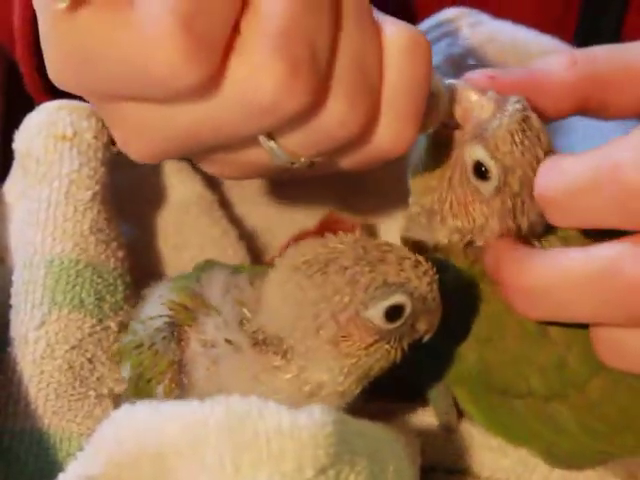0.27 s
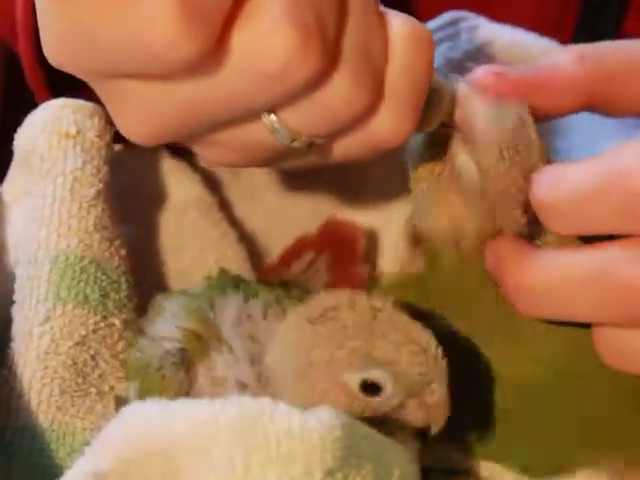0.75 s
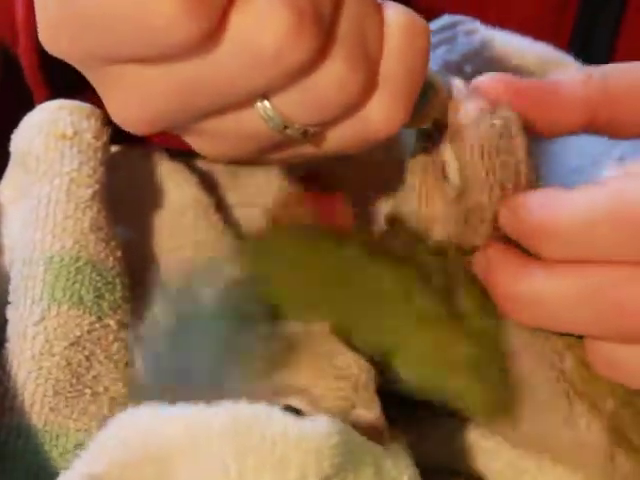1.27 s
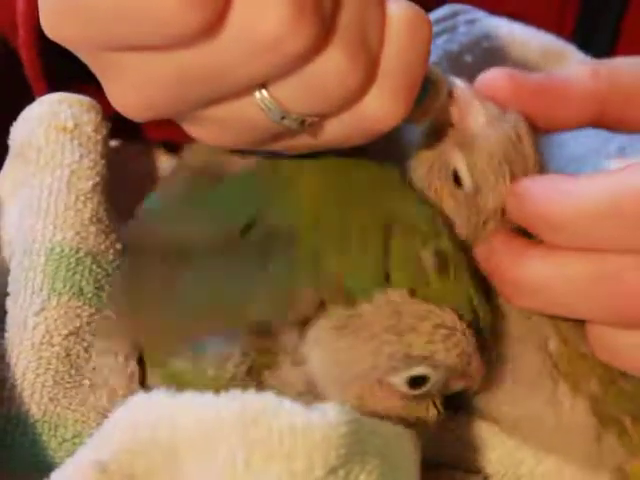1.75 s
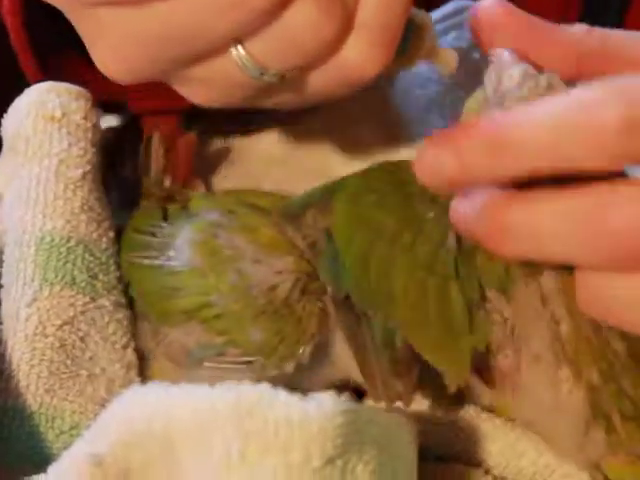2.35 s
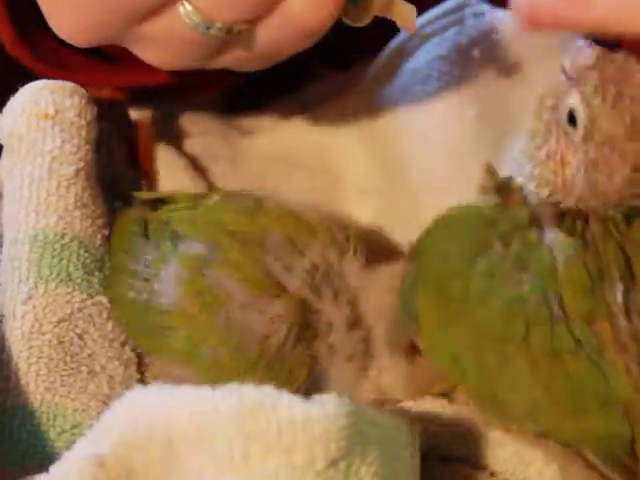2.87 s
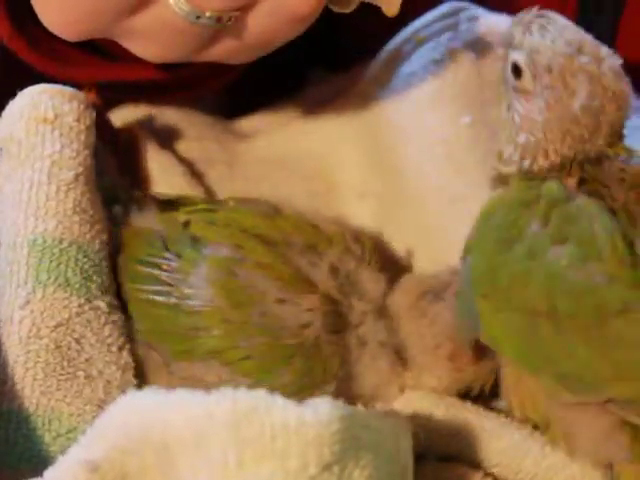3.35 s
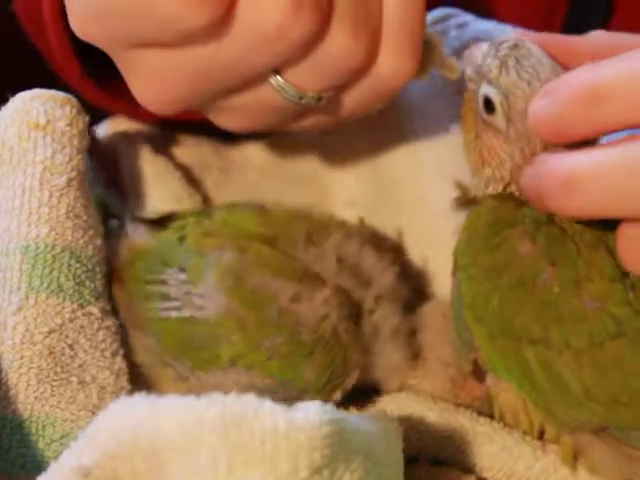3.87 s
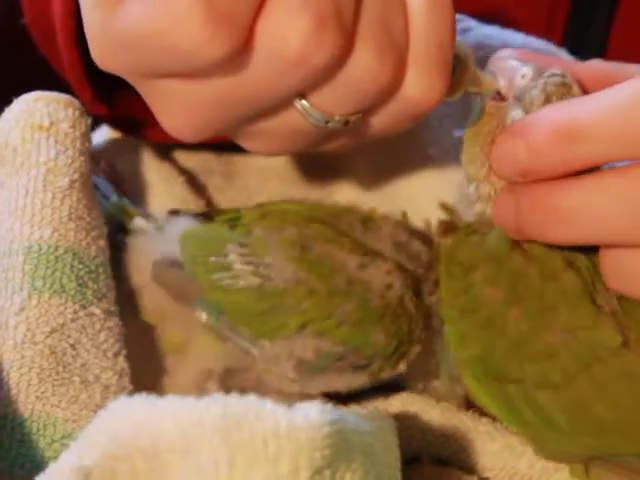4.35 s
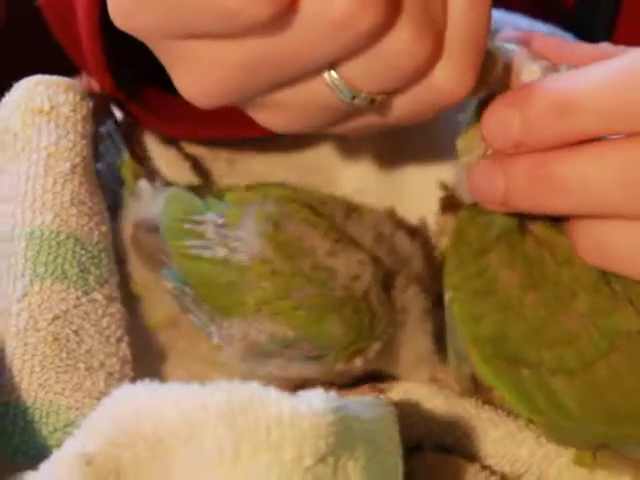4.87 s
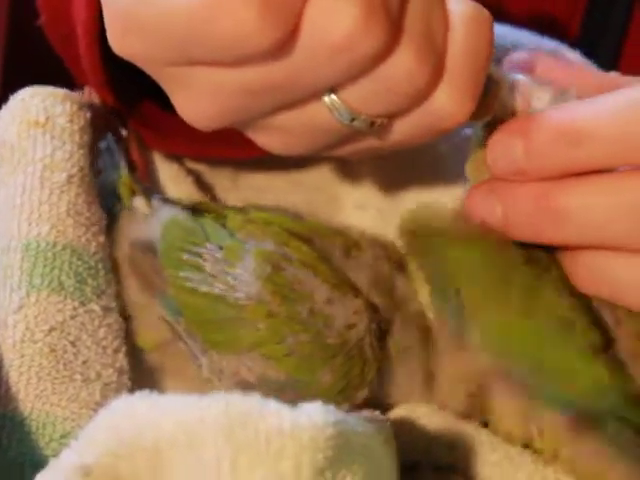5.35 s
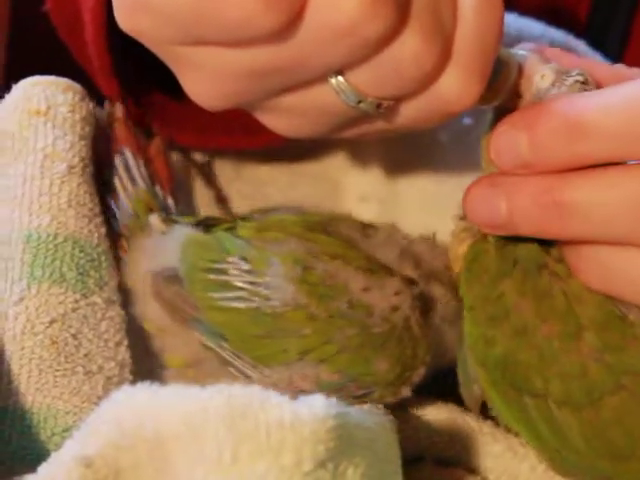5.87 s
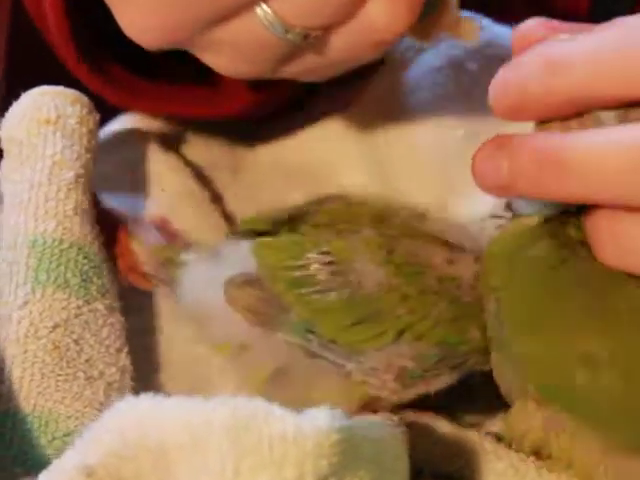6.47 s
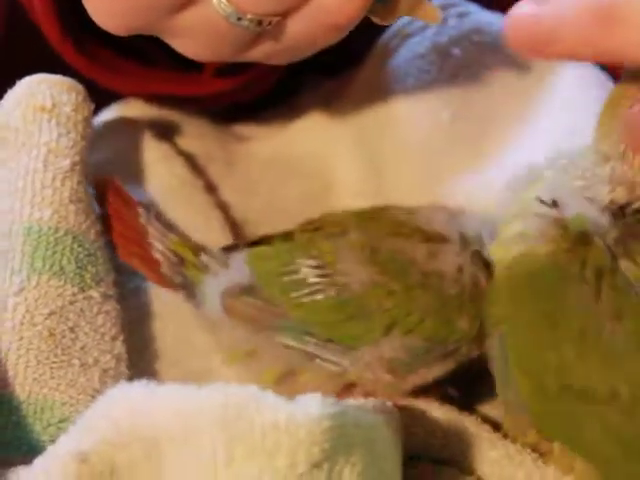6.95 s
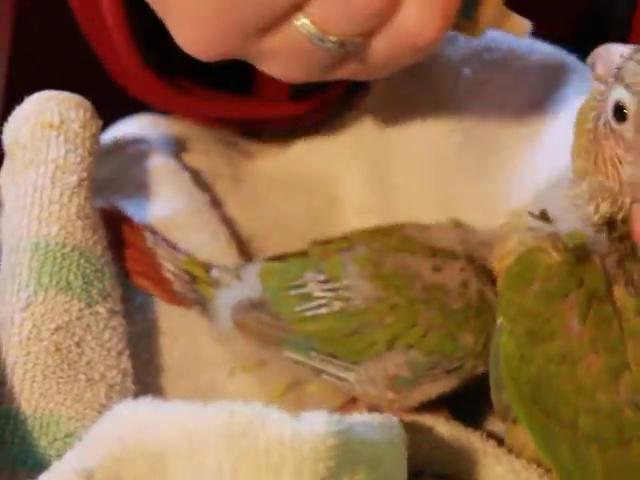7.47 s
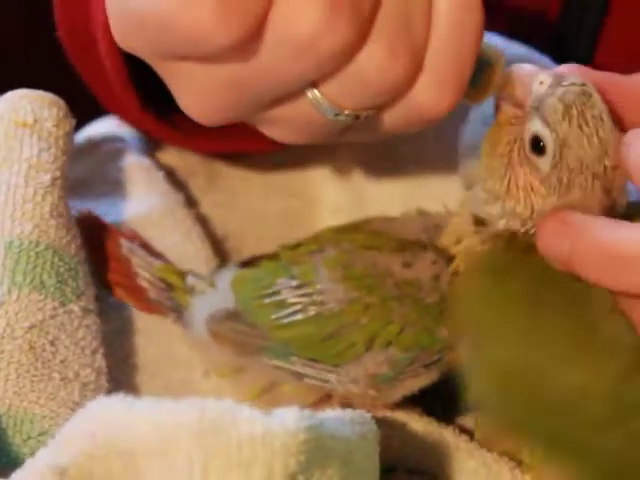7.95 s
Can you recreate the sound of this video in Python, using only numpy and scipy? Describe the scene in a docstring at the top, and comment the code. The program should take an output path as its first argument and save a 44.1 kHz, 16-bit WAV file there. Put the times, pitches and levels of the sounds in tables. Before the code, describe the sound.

Young parrots beg on a towel very close to the microphone in a small, hard-walled room. Very short harsh squawks and clear, falling chirps come singly, with quiet gaps; a throbbing rasp appears early and a fainter one later. Beaks and claws tick, bodies bump softly, cloth and feathers rustle. Near the end a hollow object is lightly knocked. Steady room air and a faint appliance hum lie beneath.

```python
"""A small hard-walled room, where parrot chicks beg on a towel close to a microphone.
Squawks, chirps and two throbbing rasps are stacks of overtones shaped by throat and beak.
Beaks tick and bodies bump as short dying tones; a hollow object rings when knocked.
Towel and feathers rustle as grainy noise over room air and an appliance's two-tone hum.
A gain control turns everything down when it gets loud, then slowly back up."""
import sys
import numpy as np
from scipy import signal
from scipy.fft import rfft, irfft, next_fast_len
from scipy.io import wavfile
from scipy.ndimage import uniform_filter1d, map_coordinates

SR = 44100
rng = np.random.default_rng(int(sys.argv[2]) if len(sys.argv) > 2 else 0)


def inscribe(sig):
    """Save sig as 16-bit PCM at rate SR to the path in sys.argv[1].

    A 1-D sig is mono; a 2-D sig holds one channel per row.
    Samples are clipped to [-1, 1] before scaling.
    """
    pcm = np.round(np.clip(np.atleast_2d(sig).T, -1, 1) * 32767)
    wavfile.write(sys.argv[1], SR, pcm.astype(np.int16))


def convert_level_to_amplitude(level_db):
    """Map a level in decibels to its linear amplitude factor."""
    exponent = np.asarray(level_db, float) / 20
    return 10 ** exponent


N = 362502  # length in samples

# harsh calls: (start t/s, length t/s, level/dB, top pitch f/Hz, top at this share of the length,
# final period-doubling level/dB)
SQUAWKS = [(.655, .035, -8, 1890, .3, 1.5), (1.7102, .031, -8.5, 1860, .55, 4),
           (2.534, .031, -6, 2030, .25, 7), (2.937, .043, -9, 2110, .35, 2.5),
           (6.1075, .032, -8, 2010, .45, .5), (6.7762, .032, -8, 1960, .55, 3)]
# clear calls: (start t/s, hold t/s, level/dB, first pitch f/Hz, held pitch f/Hz, gain over the hold level/dB)
CHIRPS = [(.0072, .025, -11, 1750, 1310, -1.5), (3.1045, .027, -14, 1100, 1325, 6),
          (4.180, .021, -17, 1600, 1265, 9), (4.9015, .016, -11, 1800, 1210, 1.2),
          (7.8645, .008, -14, 1560, 1760, 6)]
# throbbing calls: (start t/s, hold t/s, level/dB, first pitch f/Hz, held pitch f/Hz, gain over the hold level/dB)
RASPS = [(1.4645, .076, -18.5, 1150, 1380, 4.5), (5.4095, .069, -27, 1200, 1480, 4.5)]
# throbs of each rasp: (time from peak to 1/e t/s, level between throbs up to 2.5 kHz level/dB,
# breath share at 2.5 kHz)
THROBS = [(.0015, -22, 0.6), (.0021, -12, 0.62)]
# beak through all calls: (time t/s, resonance f/Hz, brightness level/dB per octave)
BEAK = [(.010, 5700, 1.2), (.016, 4200, 2.2), (.026, 4600, 2.2), (.040, 3700, 3), (.658, 4400, 3),
        (.665, 5200, 7), (.673, 4600, 6), (.680, 3300, 3), (1.471, 3000, 2.5), (1.503, 3000, 3.5),
        (1.512, 5600, 2.5), (1.521, 3200, 3.5), (1.543, 2600, 2.2), (1.714, 7000, -2.5), (1.719, 5900, 3),
        (1.726, 2900, 6), (1.732, 6800, 3), (1.741, 2900, 4), (2.537, 5600, .3), (2.548, 4750, 2.5),
        (2.565, 3400, 2.5), (2.941, 4800, 1.5), (2.946, 3100, 3), (2.953, 3400, 4), (2.959, 5400, 1.5),
        (2.970, 6100, 2.5), (3.110, 3700, 3), (3.117, 5000, -2.5), (3.124, 6500, 2.2), (3.133, 4100, 5),
        (3.150, 2600, 3), (4.184, 4000, 3.5), (4.188, 7500, -2.5), (4.194, 5000, 1.2), (4.200, 3800, 5),
        (4.906, 5500, -.5), (4.912, 4200, .3), (4.930, 3200, .3), (5.415, 2400, -1.5), (5.430, 2900, .3),
        (5.470, 3000, 1.2), (5.482, 2300, .3), (6.111, 5600, -.5), (6.117, 7200, 2.5), (6.125, 5800, 4.5),
        (6.138, 3100, 3), (6.780, 4200, .3), (6.786, 4700, -.5), (6.794, 3900, -.5), (6.803, 3100, -.5),
        (7.868, 3400, 2.5), (7.872, 6800, -1.5), (7.878, 3400, 2.5), (7.885, 5800, 1.5), (7.895, 3700, 1.2)]
# throat colour of squawks and chirps: (f/Hz, relative level/dB)
THROAT = [(500, -39.5), (1000, -14.5), (1500, -6.5), (2100, -10.5), (2900, -4), (4500, -9), (6500, -10),
          (8500, -15.5), (12000, -25), (16000, -43.5)]
# throat colour of rasps: (f/Hz, relative level/dB)
RASP_THROAT = [(500, -28), (900, -10.5), (1400, 6), (1950, -10.5), (2550, -1), (3300, -10.5), (4100, -10.5),
               (5500, 1.5), (6600, -6), (7600, -8.5), (9500, -14.5), (16000, -32.5)]
# beak or claw contacts: (start t/s, tick level/dB, tick f/Hz, bump level/dB before a 1.5 dB lift, bump f/Hz)
CONTACTS = [(0.9134, -35.5, 1700, -32, 1580), (.965, -30, 2700, -50, 1400), (0.977, -33.5, 7800, -67, 758),
            (0.995, -32, 3500, -31, 1520), (1.077, -31.5, 3500, -47, 1316),
            (1.2175, -22.5, 7850, -38, 1530), (1.2458, -30.5, 4000, -37, 1490),
            (1.296, -28, 3980, -47, 400), (1.3068, -31.5, 7500, -50, 756), (1.329, -40, 4530, -60, 900),
            (1.417, -39, 5000, -60, 900), (1.708, -24, 3000, -28, 893), (2.5277, -26, 3000, -43, 980),
            (4.0378, -57, 1570, -40.5, 400), (4.531, -40, 9000, -60, 900), (4.6014, -38, 2060, -34, 1330),
            (4.6565, -31.5, 3490, -35.5, 189), (4.680, -39, 9090, -40, 200), (4.789, -43, 6000, -60, 890),
            (5.052, -20, 2164, -40, 1206), (5.260, -43.5, 7500, -60, 896), (5.269, -29, 3000, -52, 1320),
            (5.3063, -26.5, 3650, -20.5, 829), (5.353, -29, 2570, -29, 1360),
            (5.3759, -24, 2360, -23, 1105), (5.882, -41.5, 2000, -34, 425), (6.6506, -34.5, 6000, -40, 890),
            (7.22, -37.5, 1400, -35.5, 763), (7.3307, -24, 2300, -32.5, 455),
            (7.729, -41.5, 1800, -33.5, 530), (8.072, -50, 1400, -43, 513), (8.092, -35, 2790, -42, 1100)]
# soft knocks on a hollow object: (start t/s, level/dB, hardness level/dB per octave)
KNOCKS = [(7.228, -41, -6), (8.088, -34.5, 10), (8.176, -34.5, -2)]
# ringing modes of that object: (f/Hz, relative level/dB, time to die by 60 dB t/s)
HOLLOW = [(300, 0, .08), (740, -2, .09), (1100, -4, .09), (1640, -4, .09), (2600, -20, .04)]
# early echoes from nearby surfaces: (delay t/s, level/dB)
ECHOES = [(.0021, -25.5), (.0047, -15.5), (.008, -15.5), (0.011, -10.5), (0.018, -19.5), (0.026, -13)]
# how long the walls ring: (f/Hz, time to die by 60 dB t/s)
WALLS = [(300, .35), (1300, 0.51), (2600, 0.37), (4000, 0.36), (6000, 0.34), (10000, 0.33), (16000, 0.3)]
# how strongly the walls ring: (f/Hz, relative level/dB)
WALL_GAIN = [(300, -10), (1300, -11), (2600, -6), (4000, -4), (7000, -5), (16000, -8)]
# movements: (peak t/s, rise by 20 dB t/s, cloth's fall by 20 dB t/s, cloth level/dB, feathers over cloth level/dB)
MOVEMENTS = [(1.2, .5, .4, -54, 1.5), (1.44, .25, .05, -52, .3), (2.13, .08, .2, -54, -.5),
             (2.415, .03, .1, -44, -9), (4.56, .1, .15, -61, 4), (4.68, .08, .1, -58, -9),
             (5.04, .03, .3, -49, -8), (5.28, .25, .15, -51, -11), (5.884, .01, .12, -37, -13),
             (6.65, .4, .3, -57, .3), (7.23, .2, .15, -52, -13), (7.34, .05, .05, -44, -10),
             (7.736, .015, .14, -41, -7), (8.075, .012, .12, -40, -18), (8.185, .05, .15, -50, -19)]
# colour of towel noise: (f/Hz, relative level/dB per Hz)
CLOTH = [(60, -31), (150, -4), (400, -0.5), (900, 2.5), (1700, -2.5), (3000, -6), (6000, -40.5)]
# colour of feather noise: (f/Hz, relative level/dB per Hz)
FEATHER = [(1200, -30), (2500, -1.5), (5000, -4.5), (9000, -12), (15000, -11.5)]
# colour of room air: (f/Hz, relative level/dB per Hz)
AIR = [(15, -58), (25, -24.5), (92, -9), (123, -13.5), (190, -6.5), (394, -6.5), (641, -6), (754, -4.5),
       (840, -7), (1020, -5.5), (2000, -8), (2480, -14), (16000, -29)]
# appliance tones: (f/Hz, typical rms level/dB)
HUM = [(743, -62.5), (1487, -69.5)]

# every call climbs by RISE_DB in RISE_S to BURST_DB too loud, then settles
RISE_S, RISE_DB, BURST_S, BURST_DB = .003, 38, .002, 3.5
SQUAWK_BREATH, CHIRP_BREATH = .24, .04  # noisy share of the voice (0-1)
# squawk: pitch at both ends of its arch, and level change by its end
SQUAWK_FIRST_HZ, SQUAWK_LAST_HZ, SQUAWK_FADE_DB = 1760, 1570, -6
DOUBLING_FIRST_DB, DOUBLING_S = -11, .012  # period doubling: first level, time to reach the final one
WAVER_SHARE, TREMOR_DB, WAVERS_PER_S = .03, 2.5, 160  # a squawk's unsteady pitch and level
# held calls: pitch drop after the hold, softness of its corner, and the pitch where the call stops
FALL_HZ_PER_S, KNEE_S, LOWEST_HZ = 29000, .002, 710
SLACK_HZ, SLACK_TILT_DB = 1330, -14  # below this pitch: brightness change for each octave lower
# habits: (pitch settles in t/s, period-doubling level/dB, level change/dB per octave below SLACK_HZ)
CHIRP_HABIT, RASP_HABIT = (.003, -42, -30), (.02, 2.2, -12)
THROBS_PER_S, THROB_LAG_S, THROB_SCATTER_S = 141, .0028, .0005
THROB_SPREAD_DB, THROB_TILT_DB = 1.8, 2.2  # chance in level, and in brightness per octave above 2.5 kHz


def unit(x):
    """Scales a signal to rms 1."""
    return x / np.sqrt(np.mean(x ** 2) + 1e-20)


def along(points, hz):
    """Reads values between (f/Hz, value) points, evenly by musical interval."""
    f, value = np.transpose(points)
    return np.interp(np.log(hz + 1), np.log(f + 1), value)


def add(track, s, sound):
    """Mixes a sound into the track at s seconds."""
    part = track[round(s * SR):][:len(sound)]
    part += sound[:len(part)]


def coloured(x, spectrum):
    """Filters x by raising or lowering each frequency as the colour table says."""
    size = next_fast_len(len(x) + 8192)
    gain = convert_level_to_amplitude(along(spectrum, np.fft.rfftfreq(size, 1 / SR)))
    return irfft(rfft(x, size) * gain, size)[:len(x)]


def wobble(rate, shape):
    """Draws smooth random curves through rate random points a second."""
    rows, n = shape
    knots = rng.standard_normal((rows, int(n * rate / SR) + 4))
    return map_coordinates(knots, np.meshgrid(np.arange(rows), np.arange(n) * rate / SR, indexing="ij"))


def chicks():
    """Every call as (start, sound): the syrinx, a bird's voice organ, buzzes through throat and beak."""
    squawks = [voice(squawk(*row), SQUAWK_BREATH, THROAT) for row in SQUAWKS]
    chirps = [voice(held_call(*row, CHIRP_HABIT), CHIRP_BREATH, THROAT) for row in CHIRPS]
    rasps = [voice(held_call(*row, RASP_HABIT), breath, RASP_THROAT, throbbing(width, between_db))
             for row, (width, between_db, breath) in zip(RASPS, THROBS)]
    return squawks + chirps + rasps


def voice(rows, breath, throat, flutter=None):
    """Sums syrinx overtones shaped by throat and beak; breath smears each into a band of noise."""
    s, *columns = np.transpose(rows)
    t = np.arange(s[0], s[-1] + .004, 1 / SR)
    pitch, db, doubling_db, beak_hz, tilt_db = [np.interp(t, s, column) for column in columns]
    order = np.arange(1, 41)[:, None] / 2  # half orders come from period doubling
    hz = order * pitch
    level = along(throat, hz) + tilt_db * np.log2(hz / 3500) + (order % 1 > 0) * doubling_db
    resonance = 1 + 3 / (1 + ((hz - beak_hz) / 700) ** 2)
    gain = convert_level_to_amplitude(level) * resonance * (hz < .45 * SR)
    gain /= np.sqrt(np.sum(gain ** 2, axis=0) / 2)  # same total strength at every moment
    breath = np.clip(breath, 0, 1)
    if flutter:
        throb, depth = flutter(t, hz)
        gain = gain * throb
        breath = np.clip(breath * depth, 0, 1)  # breath takes over the treble
    noise = wobble(900, hz.shape) + 1j * wobble(900, hz.shape)
    smear = np.sqrt(1 - breath) + np.sqrt(breath / 2) * noise
    phase = 2 * np.pi * (np.cumsum(hz, axis=1) / SR + .5 + .4 * rng.random(order.shape))
    fade = np.clip((t[-1] - t) / .004, 0, 1)
    overtones = gain * smear * np.exp(1j * phase)
    return t[0], convert_level_to_amplitude(db) * fade * np.sum(overtones, axis=0).real


def squawk(s, length, db, top_hz, top_at, full_db):
    """Pitch arches unsteadily and the call fades; every other cycle grows unlike its neighbour."""
    u = np.arange(0, length, 1 / SR)
    share = u / length
    end_hz = np.where(share < top_at, SQUAWK_FIRST_HZ, SQUAWK_LAST_HZ)
    away = (share - top_at) / np.where(share < top_at, top_at, 1 - top_at)  # distance from the top of the arch
    waver, tremor = wobble(WAVERS_PER_S, (2, SR // 10))[:, :len(u)]
    pitch = (top_hz + (end_hz - top_hz) * away ** 2) * (1 + WAVER_SHARE * waver)
    level = db + attack(u) + SQUAWK_FADE_DB * share + TREMOR_DB * tremor
    doubling_db = np.interp(u, [0, DOUBLING_S], [DOUBLING_FIRST_DB, full_db])
    return np.transpose([s + u, pitch, level, doubling_db, *beak(s + u)])


def held_call(s, hold, db, first_hz, held_hz, swell_db, habit):
    """Pitch settles and holds, then drops as the syrinx slackens, ever softer and duller."""
    settle, doubling_db, slack_db = habit
    u = np.arange(0, hold + (held_hz - LOWEST_HZ) / FALL_HZ_PER_S, 1 / SR)
    tense_hz = held_hz + (first_hz - held_hz) * np.exp(-u / settle)
    pitch = tense_hz - FALL_HZ_PER_S * KNEE_S * np.logaddexp(0, (u - hold) / KNEE_S)
    slack = np.maximum(np.log2(np.minimum(tense_hz, SLACK_HZ) / pitch), 0)  # in octaves
    level = db + attack(u) + swell_db * np.minimum(u / hold, 1) + slack_db * slack
    doubling_db = doubling_db + 2 * slack_db * slack
    beak_hz, tilt_db = beak(s + u)
    return np.transpose([s + u, pitch, level, doubling_db, beak_hz, tilt_db + SLACK_TILT_DB * slack])


def throbbing(width, between_db):
    """Air comes in quick, nearly even throbs of chance brightness that melt away as the call ends."""
    def flutter(t, hz):
        """Gives the throbs' gain and the breath's strength for each overtone."""
        octaves = np.maximum(np.log2(hz / 2500), 0)
        throb = convert_level_to_amplitude(between_db - 5.5 * octaves)
        chance = rng.standard_normal((20, 3)) * [THROB_SCATTER_S, THROB_SPREAD_DB, THROB_TILT_DB]
        for k, (late, db, brightness_db) in enumerate(chance):
            peak = t[0] + THROB_LAG_S + k / THROBS_PER_S + late
            throb = throb + convert_level_to_amplitude(db + brightness_db * octaves) * np.exp(-((t - peak) / width) ** 2)
        depth = np.clip((t[-1] - t) / .02, 0, 1)
        return 1 + depth * (throb - 1), depth * (.5 + hz / 5000)
    return flutter


def attack(u):
    """Level change in dB, u seconds into a call: the voice breaks in too hard, then settles."""
    rise = -RISE_DB * np.clip(1 - u / RISE_S, 0, 1)
    return rise + BURST_DB * np.exp(-np.maximum(u - RISE_S, 0) / BURST_S)


def beak(t):
    """The moving beak's resonance and brightness at times t."""
    s, hz, tilt_db = np.transpose(BEAK)
    return np.interp(t, s, hz), np.interp(t, s, tilt_db)


def contacts():
    """A beak or claw ticks in a few bright cycles; the body behind it bumps and dies away by its own pitch."""
    t = np.arange(SR // 20) / SR
    out = []
    for s, tick_db, tick_hz, bump_db, bump_hz in CONTACTS:
        scrape = uniform_filter1d(rng.standard_normal(len(t)), size=max(round(SR / tick_hz / 4), 1))
        crack = np.sin(2 * np.pi * tick_hz * t) * convert_level_to_amplitude(-6 * tick_hz * t)
        crack += 0.587 * unit(scrape) * convert_level_to_amplitude(-60 * t / 0.02)
        cycles = bump_hz * t
        bump = np.sin(2 * np.pi * cycles) * convert_level_to_amplitude(-7 * cycles)
        bump += .5 * np.sin(2 * np.pi * 2.41 * cycles) * convert_level_to_amplitude(-14 * cycles)
        tick = convert_level_to_amplitude(tick_db) * (1 - np.exp(-t / .0003)) * crack
        out.append((s, tick + convert_level_to_amplitude(bump_db + 1.5) * bump))
    return out


def knocks():
    """Each knock rings the same modes of a hollow object; a harder one favours the upper modes."""
    t = np.arange(SR // 5) / SR
    hz, level, t60 = np.transpose(HOLLOW)[:, :, None]
    out = []
    for s, db, hardness_db in KNOCKS:
        strength = convert_level_to_amplitude(db + level + hardness_db * np.log2(hz / 740) - 60 * t / t60)
        cycles = hz * t + 0.28 * wobble(150, strength.shape)  # slightly unsteady
        ring = np.sum(strength * np.sin(2 * np.pi * cycles), axis=0)
        out.append((s, ring * (1 - np.exp(-t / 0.0026))))
    return out


def room(sound):
    """Nearby surfaces echo early, while the walls' noisy tail swells in and dies band by band."""
    hz, t, z = signal.stft(rng.standard_normal(SR * 3 // 4), SR, nperseg=256)
    decay = convert_level_to_amplitude(-60 * t / along(WALLS, hz)[:, None])
    decay *= convert_level_to_amplitude(along(WALL_GAIN, hz))[:, None] / np.linalg.norm(decay, axis=1, keepdims=True)
    noise = unit(np.abs(z)) * z / np.abs(z)
    tail = signal.istft(noise * decay, SR, nperseg=256)[1]
    swell = 1 - np.exp(-(np.arange(len(tail)) / SR / .02) ** 2)
    answer = .013 * tail * swell
    answer[0] = 1  # the direct sound
    for delay, db in ECHOES:
        answer[round(delay * SR)] += convert_level_to_amplitude(db)
    return signal.fftconvolve(sound, answer)


def rustle():
    """Bodies shift on the towel and feathers brush: clumped noise grains swell with each movement."""
    t = np.arange(N) / SR
    grain = convert_level_to_amplitude(1.6 * wobble(150, (2, N))) * rng.standard_normal((2, N))
    cloth = unit(coloured(grain[0], CLOTH))
    feather = unit(coloured(grain[1], FEATHER))
    cloth_gain, feather_gain = np.zeros((2, N))
    for s, rise, fall, db, over_db in MOVEMENTS:
        cloth_gain += convert_level_to_amplitude(db - 20 * np.maximum((s - t) / rise, (t - s) / fall))
        feather_fall = fall * 1.4  # feathers linger
        feather_gain += convert_level_to_amplitude(db + over_db - 20 * np.maximum((s - t) / rise, (t - s) / feather_fall))
    return cloth_gain * cloth + feather_gain * feather


def background():
    """Room air is gently uneven coloured noise; an appliance hums in slightly unsteady pure tones."""
    t = np.arange(N) / SR
    sway = wobble(2.3, (1 + len(HUM), N))
    sound = convert_level_to_amplitude(-51 + 0.2 * sway[0]) * unit(coloured(rng.standard_normal(N), AIR))
    for (hz, db), drift in zip(HUM, sway[1:]):
        tone = np.sin(2 * np.pi * hz * t + 3.2 * drift)
        sound += np.sqrt(2) * convert_level_to_amplitude(db + 2.0 * drift) * tone
    return sound


def scene():
    """Calls, contacts and knocks pass through the room; all sources reach one microphone."""
    near = np.zeros(N)
    for s, sound in chicks() + contacts() + knocks():
        add(near, s, room(sound))
    return np.tile(near + rustle() + background(), (2, 1))  # two equal channels


def roll_off(x):
    """The treble ends steeply here."""
    return signal.sosfilt(signal.butter(12, 16290, fs=SR, output="sos"), x)


def record(dry):
    """Gain control ducks within moments of a loud sound and recovers steadily; peaks round off."""
    power = np.abs(uniform_filter1d(dry[0] ** 2, size=221))  # averaged over 5 ms
    over_db = 0.54 * np.maximum(10 * np.log10(power + 1e-12) + 24, 0)  # acts above -24 dB
    release_db = 45 * np.arange(N) / SR  # recovers 45 dB a second
    held_db = np.maximum.accumulate(over_db + release_db) - release_db
    keep = np.exp(-1 / (0.028 * SR))  # smooths the ducking over 28 ms
    duck_db = signal.lfilter([1 - keep], [1, -keep], held_db)
    wet = dry * convert_level_to_amplitude(-duck_db)
    wet -= 0.017 * wet ** 2  # the microphone bends loud peaks unevenly, which leaves a low thump
    rounded = wet / (1 + np.abs(wet) ** 8) ** (1 / 8)
    return roll_off(rounded)


dry = scene()
out = record(dry)
inscribe(out)
```